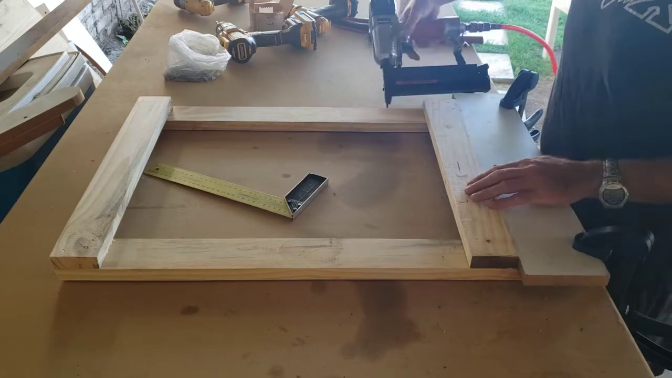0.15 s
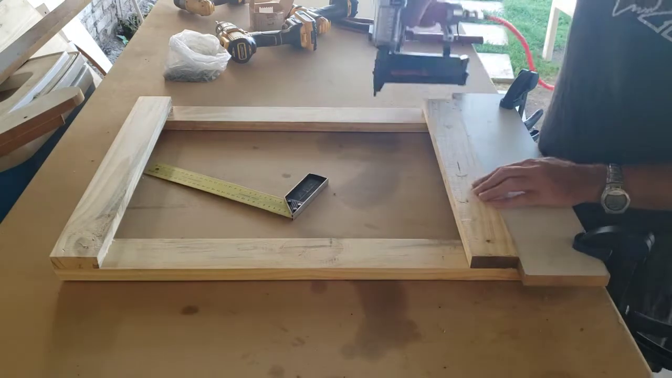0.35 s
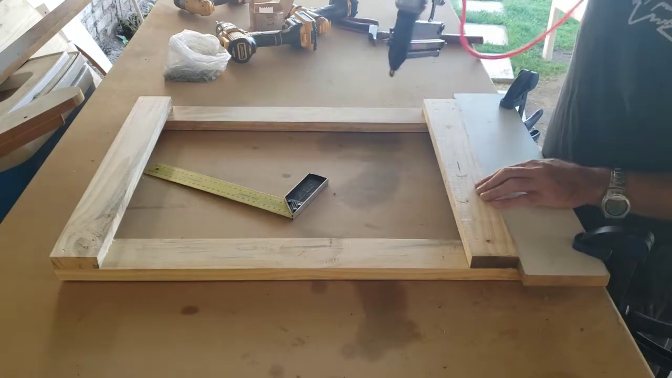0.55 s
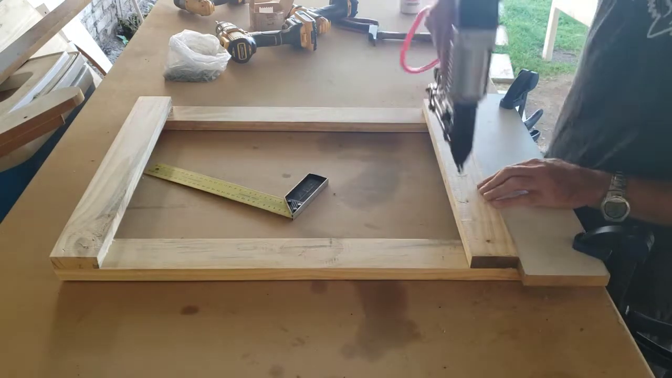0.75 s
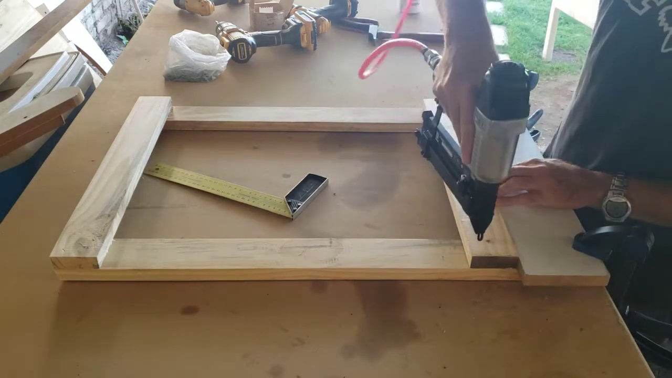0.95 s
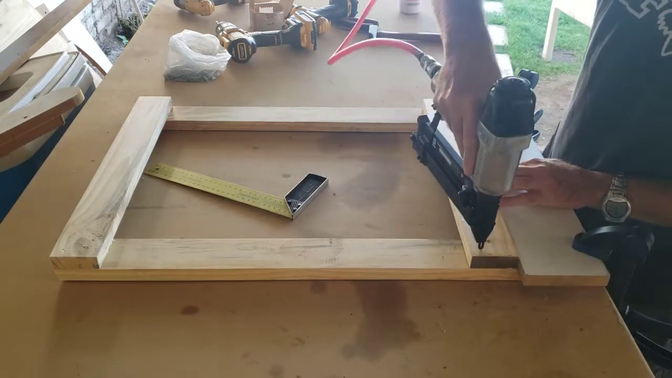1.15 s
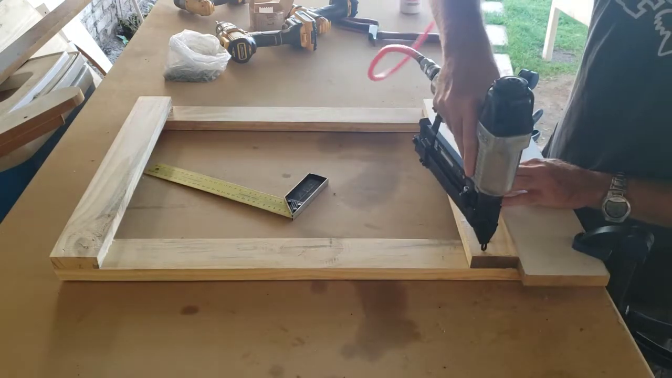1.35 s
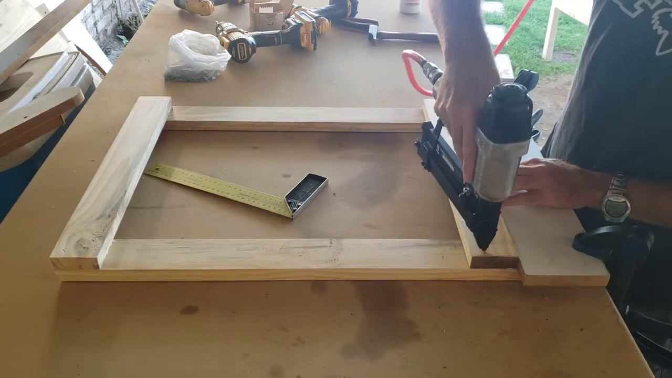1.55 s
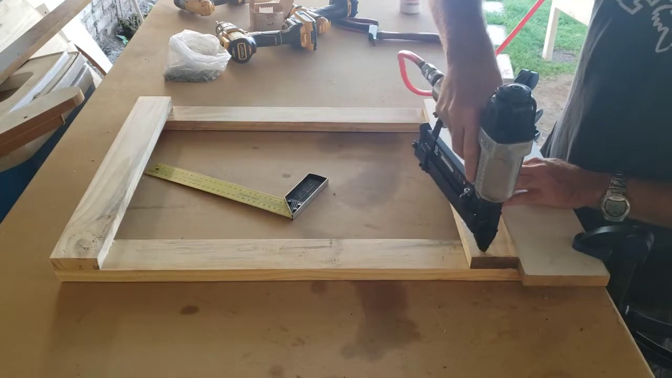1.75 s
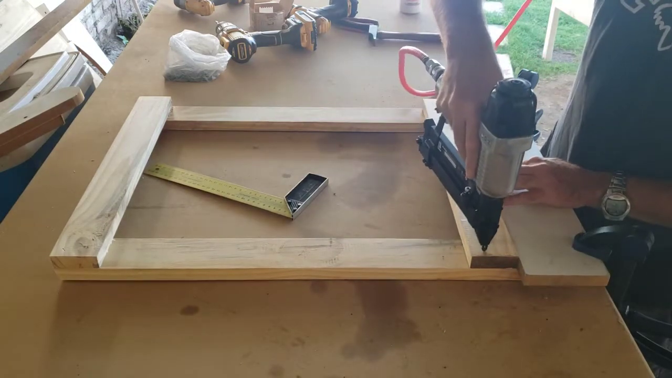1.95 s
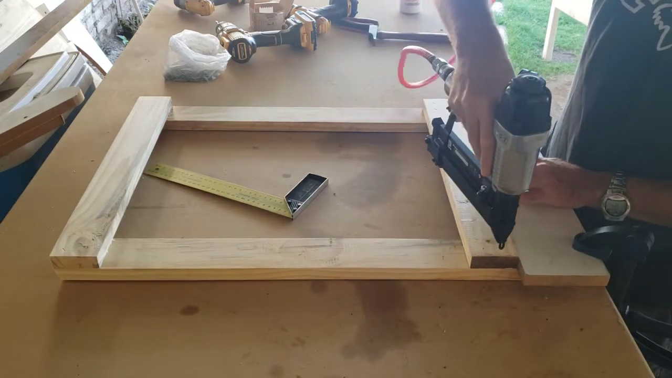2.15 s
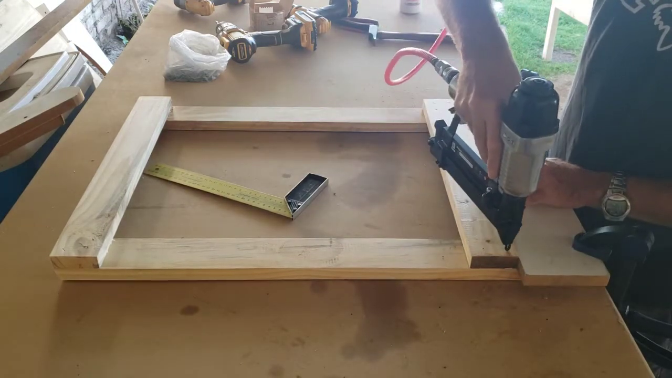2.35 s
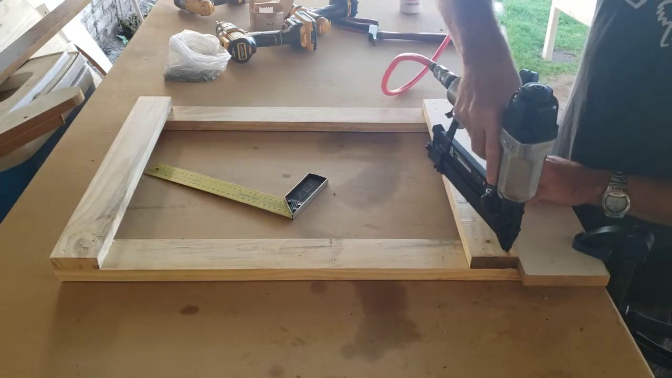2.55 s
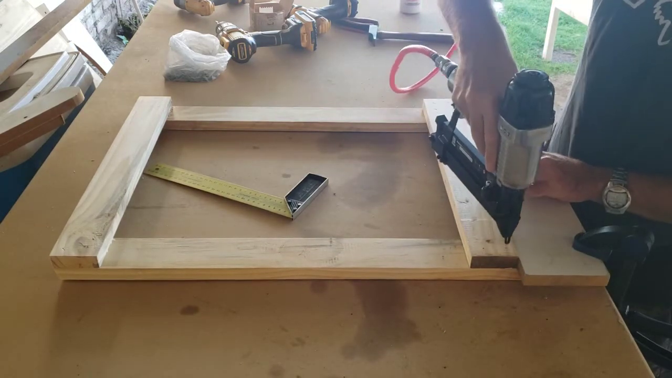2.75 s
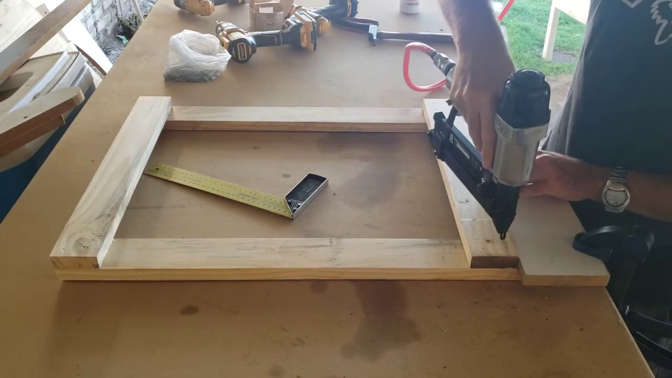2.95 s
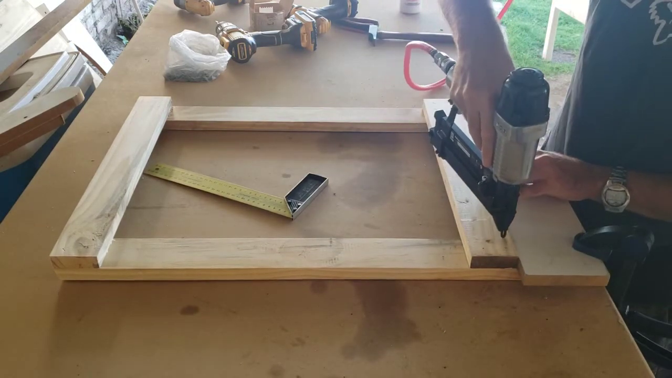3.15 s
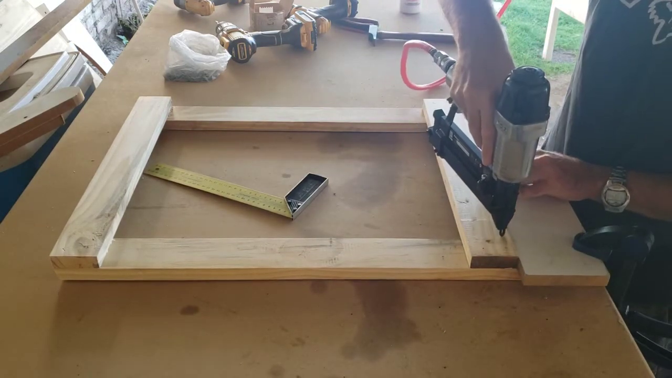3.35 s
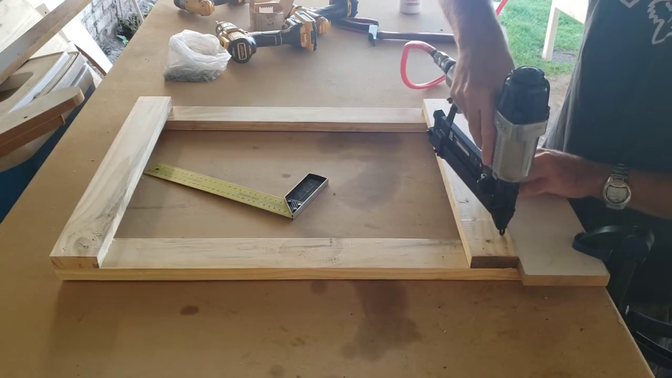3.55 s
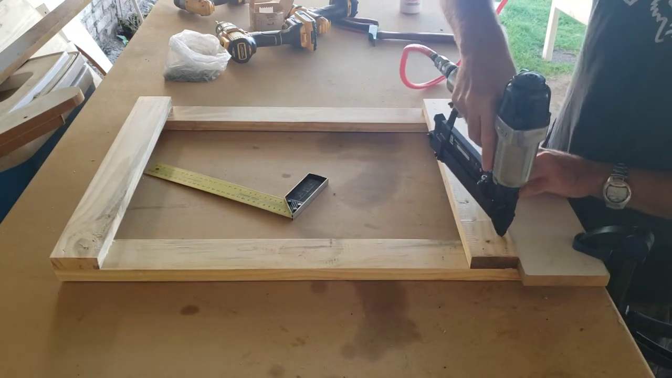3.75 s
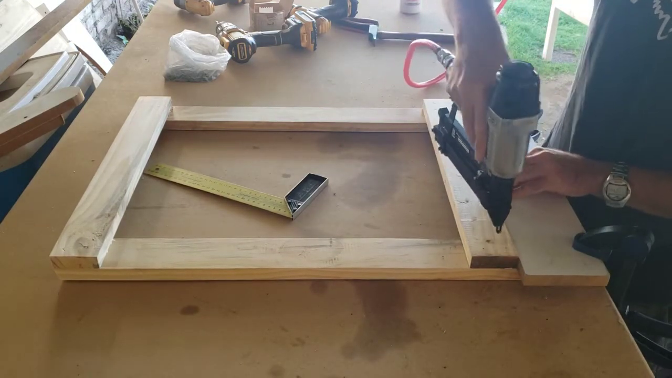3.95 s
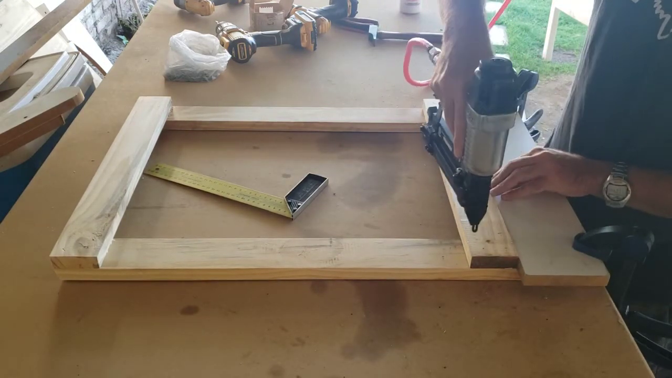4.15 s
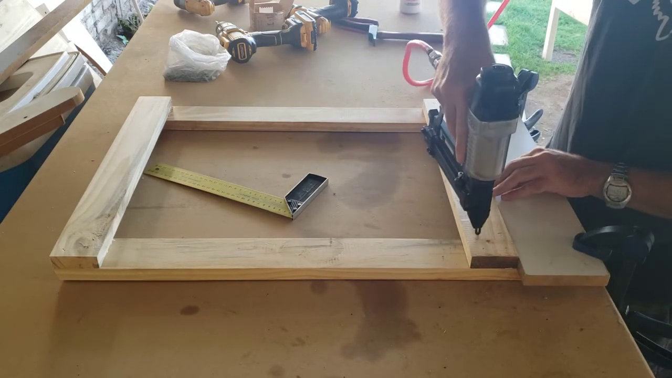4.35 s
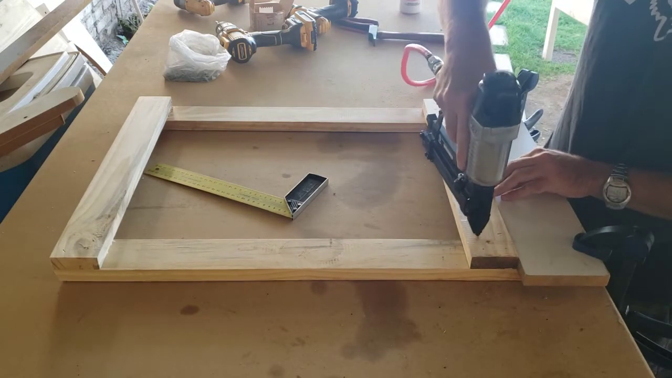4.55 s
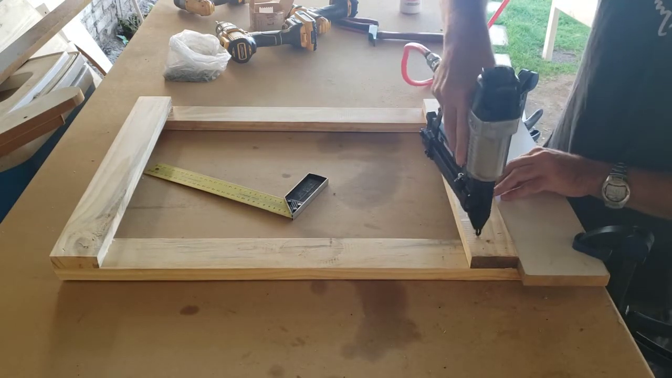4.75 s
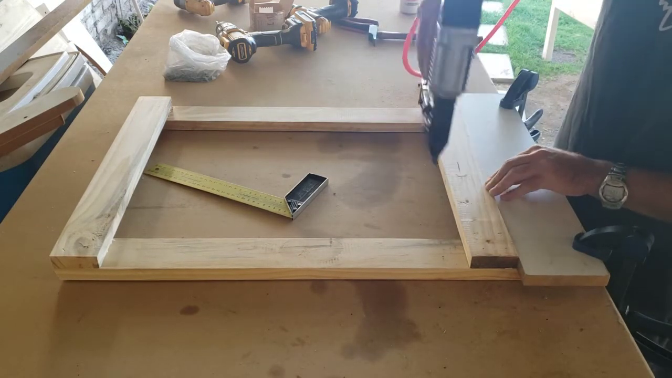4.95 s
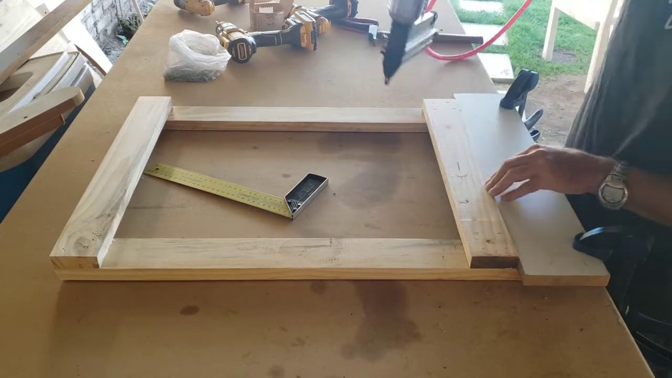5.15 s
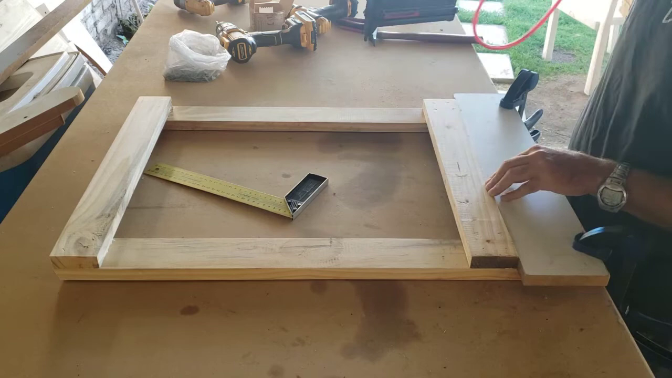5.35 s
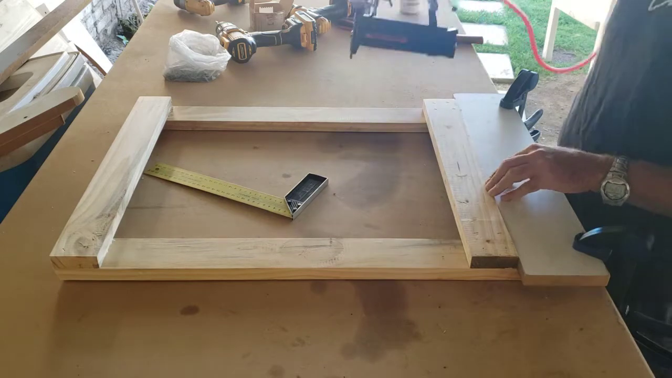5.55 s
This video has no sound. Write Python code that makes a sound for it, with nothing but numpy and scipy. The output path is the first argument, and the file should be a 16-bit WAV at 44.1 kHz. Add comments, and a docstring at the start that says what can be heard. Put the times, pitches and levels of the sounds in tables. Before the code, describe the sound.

An air nailer fires four sharp, airy shots into a wooden board on a workshop bench, with scuffs, thuds and low hum between.

```python
"""A mains hum and a low rumble with faint hiss run throughout; from the start come broad, dull and bright scuffs
with thuds at a bench in an open workshop (noise bands, bench modes), a small part clinks, then four nails are driven.
Each shot: valve hiss (jet noise), the blow on the board (damped modes) with a burst of air, then the exhaust leaks,
blasts and bleeds while the piston knocks the housing and the steel rings on. Two dull ticks fall between the second
and third shots. The first shot turns the gain control down for good."""
import sys
import numpy as np
from scipy import signal
from scipy.fft import rfft, irfft
from scipy.io import wavfile
from scipy.ndimage import uniform_filter1d

SR = 44100
rng = np.random.default_rng(int(sys.argv[2]) if len(sys.argv) > 2 else 0)


def persist_wave(psi):
    """Save psi, clipped to +-1, as 16-bit WAV."""
    counts = np.round(np.clip(psi, -1, 1) * 32767).astype(np.int16)
    wavfile.write(sys.argv[1], SR, np.atleast_2d(counts).T)


N = 250910


def from_db(db):
    """Level law: decibels to amplitude gain."""
    return 10 ** (np.asarray(db) / 20)


def at_hz(points, hz):
    """Interpolation on a logarithmic frequency axis: reads a table's second column."""
    table = np.array(points)
    return np.interp(np.log(hz + 1e-9), np.log(table[:, 0] + 1e-9), table[:, 1])


def colour(x, points, share=1):
    """Minimum-phase filtering: folding the cepstrum makes a table's dB curve, times share, causal."""
    size = 2 ** 13
    log_gain = share * at_hz(points, np.fft.rfftfreq(size, 1 / SR)) * np.log(10) / 20
    cepstrum = irfft(log_gain)
    cepstrum[1:size // 2] *= 2
    cepstrum[size // 2 + 1:] = 0
    response = irfft(np.exp(rfft(cepstrum)))
    return signal.fftconvolve(x, response)[:len(x)]


def fade(start, t60, rise=.002):
    """Exponential decay: an envelope that rises at start and dies by 60 dB in t60 seconds."""
    t = np.maximum(np.arange(N) / SR - start, 0)
    return (1 - np.exp(-t / rise)) * from_db(-60 * t / t60)


def strike(times, levels_db, modes, spread_db=6.0):
    """Modal synthesis: each blow rings every damped mode, neighbours in opposite sense, at a random strength."""
    out = np.zeros(N)
    at = (np.array(times) * SR).astype(int)
    chance = rng.standard_normal((len(at), len(modes)))
    for k, (hz, mode_db, t60) in enumerate(modes):
        clicks = np.full(N, 1e-18)
        clicks[at] = (-1) ** k * from_db(np.array(levels_db) + mode_db + spread_db * chance[:, k])
        radius = from_db(-60 / (t60 * SR))
        w = 2 * np.pi * hz / SR
        out += signal.lfilter([0, np.sin(w)], [1, -2 * radius * np.cos(w), radius ** 2], clicks)
    return out


# Likeness of diffuse sound. Each row: frequency in Hz, left-right correlation from 0 to 1.
LEFT_RIGHT_LIKENESS = [(60, 1), (300, 0.86), (700, 0.28), (1500, 0.09), (16000, 0.065)]


def stereo_bands(length, gain_at):
    """Diffuse-field coherence: half-octave noise, alike left and right in the bass, each under gain_at(Hz)."""
    out = 0
    edges = 22 * 2 ** np.arange(0, 10, .5)
    white = rng.standard_normal((2, 2, length))
    for k, (low, high) in enumerate(zip(edges, edges[1:])):
        band = signal.butter(2, [low, high], "band", fs=SR, output="sos")
        mid, side = signal.sosfilt(band, white[k % 2])   # neighbouring bands use different noise
        hz = np.sqrt(low * high)
        alike = np.clip(at_hz(LEFT_RIGHT_LIKENESS, hz), -1, 1)
        pair = np.sqrt(1 + alike) * mid + np.sqrt(1 - alike) * side * [[1], [-1]]
        out = out + gain_at(hz) * pair
    return out


# Spectrum of the surroundings. Each row: frequency in Hz, relative density in dB per Hz.
RUMBLE_SPECTRUM = [(15, -14.5), (42, 1), (75, -0.5), (100, -2.5), (130, -12.5), (180, -16.5), (245, -8.5),
                   (330, -28), (680, -35), (1000, -45), (2000, -55), (7000, -65.5), (9000, -64),
                   (12500, -62.5), (16000, -61)]
RUMBLE_DB, HUM_HZ, HUM_DB = -45, 99.6, -44   # rms levels before the lean
BACKGROUND_LEFT_DB = 1.04   # left raised and right lowered by this


def background():
    """Stationary noise and a phase-modulated tone: rumble, faint hiss and a wavering mains hum."""
    rumble = stereo_bands(N, lambda hz: 1)
    rumble = np.array([colour(c, RUMBLE_SPECTRUM) for c in rumble])
    slow = signal.lfilter([1], [1, -1.8, .81], rng.standard_normal(N // 200 + 100))[98:]
    waver = np.interp(np.arange(N) / 200, np.arange(len(slow)), slow / np.std(slow))
    hum = np.sqrt(2) * np.sin(2 * np.pi * HUM_HZ * np.arange(N) / SR + 0.31 * waver)   # phase in radians
    lean = from_db([[BACKGROUND_LEFT_DB], [-BACKGROUND_LEFT_DB]])
    return lean * (from_db(RUMBLE_DB) * rumble / np.std(rumble) + from_db(HUM_DB) * hum)


# Dry ticks close to the microphones. Each row: time in seconds, impulse level in dB before the low-pass.
DRY_TICKS = [(3.395, -19.5), (3.413, -29)]


def ticks():
    """Impulse response of a low-pass: short dull clicks without any room."""
    clicks = np.zeros(N)
    for s, level_db in DRY_TICKS:
        clicks[int(s * SR)] = from_db(level_db)
    return signal.lfilter(*signal.butter(2, 900, fs=SR), clicks)


# Clink of a small part. One row: time in seconds, level in dB,
# modes (each: frequency in Hz, level in dB, t60 in seconds).
SMALL_PART_CLINK = (0.750, -58, [(1983, -9, 0.028), (3960, 5.5, 0.022), (4270, -6, 0.022),
                    (4600, -8, 0.023)])


def clink():
    """Modal ringing: one small part is struck once."""
    s, level_db, modes = SMALL_PART_CLINK
    return strike([s], [level_db], modes, spread_db=0.9)


# Modes of the bench. Each row: frequency in Hz, level in dB, t60 in seconds.
BENCH_MODES = [(55.4, -12, 0.053), (181, -10, 0.015), (248, -6.5, 0.044), (365, -9.5, 0.075),
               (514, -7, 0.013), (780, -5, 0.0097), (1260, -7, 0.009), (1660, -11, .007),
               (2910, -15, 0.003)]
# Short broad scuffs with a soft thud, some just before a shot.
# Each row: start in seconds, scuff level in dB before its band-pass, scuff t60 in seconds.
BROAD_SCUFFS = [(0.104, -32.5, 0.028), (0.324, -22, 0.017), (1.233, -65, 0.092), (1.585, -49.5, 0.053),
                (2.503, -47, 0.082), (4.595, -43.5, .12)]
# Hands and boards rub dully on the bench.
# Each row: start in seconds, scuff level in dB before its band-pass, scuff t60 in seconds.
DULL_RUBS = [(0.002, -39, 0.21), (0.096, -46, 0.13), (0.648, -55, 0.16), (1.578, -49, 0.18),
             (2.449, -57.5, 0.71), (2.527, -45, .1), (3.436, -65, 0.24), (3.776, -44.5, 0.16),
             (4.450, -46, 1.9), (5.350, -63, 0.19)]
# Brief bright scuffs and faint hisses, one shortly before the third shot.
# Each row: start in seconds, scuff level in dB before its band-pass, scuff t60 in seconds.
BRIGHT_SCUFFS = [(0.023, -47.5, 0.1), (0.151, -61, 0.92), (0.752, -54.5, 0.022), (1.548, -55, 0.028),
                 (2.282, -53.5, 0.031), (2.475, -61, 0.09), (3.760, -54, 0.15), (4.355, -60, 0.038),
                 (4.555, -61.5, .15)]
# scuff band in Hz; thud in dB above the scuff, before the loss for long scuffs
BROAD_HZ, BROAD_THUD_DB = (805, 18000), 5.5
RUB_HZ, RUB_THUD_DB = (280, 1900), 10
BRIGHT_HZ, BRIGHT_THUD_DB = (3000, 16500), -5
THUD_LOSS_DB_PER_S = 14.5   # the longer the scuff drags, the less it thuds


def handling():
    """Friction and impact: each row is a scuff of band noise and a soft modal thud in the bench."""
    out = np.zeros(N)
    white = rng.standard_normal(N)
    for rows, band_hz, thud_db in ((BROAD_SCUFFS, BROAD_HZ, BROAD_THUD_DB),
                                   (DULL_RUBS, RUB_HZ, RUB_THUD_DB),
                                   (BRIGHT_SCUFFS, BRIGHT_HZ, BRIGHT_THUD_DB)):
        scuff = signal.lfilter(*signal.butter(2, band_hz, "band", fs=SR), white)
        # long scuffs swell slowly
        envelope = sum(from_db(db) * fade(s, t60, rise=.001 + .06 * t60 ** 2) for s, db, t60 in rows)
        out += scuff * envelope
        s, db, t60 = np.transpose(rows)
        out += strike(s, db + thud_db - THUD_LOSS_DB_PER_S * t60, BENCH_MODES, spread_db=4.0)
    return out


# Airy bands that linger after each shot.
# Each row: centre in Hz, width in Hz, level in dB, t60 in seconds.
STEEL_BANDS = [(5240, 300, -70.5, .9), (6550, 300, -64, .9), (7350, 250, -61, 1), (8950, 300, -68, .7),
               (11600, 300, -68, .6)]


def steel_ring():
    """Modal overlap: clusters of close modes in the tool's steel parts blur into narrow bands of noise."""
    out = np.zeros(N)
    for hz, width_hz, level_db, t60 in STEEL_BANDS:
        edges = [hz - width_hz / 2, hz + width_hz / 2]
        sos = signal.butter(2, edges, "band", fs=SR, output="sos")
        band = signal.sosfilt(sos, rng.standard_normal(N))
        ringing = sum(fade(back, t60) for _, _, _, back, *_ in SHOTS)
        out += from_db(level_db) * band / np.std(band) * ringing
    return out


JET_OWN_SHARE, JET_OWN_HZ = .6, 2500   # noise of each microphone's own, and the high-pass on it


def hiss(points):
    """Jet noise: a spread turbulent source, so each microphone hears some treble of its own; rms near 1."""
    shared, *own = rng.standard_normal((3, N))
    own = signal.lfilter(*signal.butter(2, JET_OWN_HZ, "high", fs=SR), own)
    x = np.array([colour(shared + JET_OWN_SHARE * o, points) for o in own])
    return x / np.std(x)


# Spectrum of the exhaust jet. Each row: frequency in Hz, relative density in dB per Hz.
EXHAUST_SPECTRUM = [(120, -46.5), (200, -3.5), (334, -13.5), (836, -29.5), (1300, -13.5), (6880, -11),
                    (8120, -5.5), (10300, -3), (15100, 0), (16000, 3)]
# Modes of the tool housing. Each row: frequency in Hz, level in dB, t60 in seconds.
HOUSING_MODES = [(70, -24.5, 0.055), (158, -17, 0.029), (283, -12.5, 0.053), (575, -8.5, 0.04),
                 (834, -5.5, 0.029), (928, -5, 0.022), (1205, -9, 0.021), (1990, -8.5, 0.014),
                 (2840, -12, 0.0091)]
# Low push of air as valve or exhaust opens. Each row: frequency in Hz, level in dB, t60 in seconds.
PUFF_MODES = [(110, -15, .015), (200, -9, 0.024)]
RETURN_S = .0213   # the exhaust is fully open this long before the piston is back
BLAST_RISE_S, BLAST_HOLD_S, BLAST_T60_S = 0.0036, 0.024, 0.091
BLEED_DB, BLEED_T60_S, BLEED_END_S = -15, 0.65, 0.24   # level against the blast; then it runs dry
PISTON_DB = -6        # piston knock against the blow
CONTACT_HZ = 4970     # low-pass: the blow lasts a fraction of a millisecond


def returns():
    """Cylinder discharge and rebound: the exhaust leaks, blasts and bleeds out; the piston knocks the housing."""
    flow = np.zeros(N)
    t = np.arange(N) / SR
    for _, _, cracks, back, _, _, leak_db, blast_db in SHOTS:
        opens = back - RETURN_S
        shuts = opens + BLAST_HOLD_S
        flow += from_db(leak_db) * fade(cracks, 9.0, rise=0.0021) * (t < shuts)
        dying = from_db(-60 * np.maximum(t - shuts, 0) / BLAST_T60_S)
        flow += from_db(blast_db) * fade(opens, 9.0, rise=BLAST_RISE_S) * dying
        running_dry = np.exp(-((t - opens) / BLEED_END_S) ** 6)
        flow += from_db(blast_db + BLEED_DB) * fade(opens, BLEED_T60_S) * running_dry
    _, _, _, back, _, blow_db, _, blast_db = np.transpose(SHOTS)
    knocks = strike(back, blow_db + PISTON_DB, HOUSING_MODES, spread_db=1.58)
    knocks = signal.lfilter(*signal.butter(2, CONTACT_HZ, fs=SR), knocks)
    puffs = strike(back - RETURN_S, blast_db, PUFF_MODES, spread_db=1.9)
    return flow * hiss(EXHAUST_SPECTRUM) + puffs + knocks


# The four shots. Each row: valve opens, nail struck, exhaust cracks open and piston back, all in seconds;
# then valve hiss, blow, leak and blast levels in dB.
SHOTS = [(1.7884, 1.8068, 1.9134, 1.9423, -24, 9.7, -13, -7.5),
         (2.5404, 2.5586, 2.6700, 2.6983, -25, 7, -17, -7),
         (3.8054, 3.8284, 3.9334, 3.9648, -27.5, 7.6, -20.5, -5.5),
         (4.6195, 4.6375, 4.7790, 4.8094, -28.5, 7.9, -23.5, -5.5)]
# Spectrum of the valve hiss. Each row: frequency in Hz, relative density in dB per Hz.
VALVE_SPECTRUM = [(120, -39.5), (200, -5), (491, -11), (1230, -8.5), (1940, -13), (5230, -9), (14900, 1),
                  (16000, -7)]
# Spectrum of the air burst round the nose. Each row: frequency in Hz, relative density in dB per Hz.
BURST_SPECTRUM = [(300, -31.5), (1500, -8.5), (3200, -4), (5500, -9), (8000, -6.5), (12300, -2),
                  (16000, -5)]
# Modes of the board. Each row: frequency in Hz, level in dB, t60 in seconds.
BOARD_MODES = [(75, -19.5, .11), (148, -17.5, 0.062), (245, -13, 0.033), (291, -18.5, 0.092),
               (415, -14.5, .02), (800, -7.5, 0.011), (1020, -3.5, 0.0089), (1229, -4, 0.017),
               (1320, -4, 0.014), (1635, -6, 0.011), (2130, -10.5, 0.0056), (2664, -10, 0.011),
               (3730, -5.5, 0.0012), (5000, -8.5, 0.0061)]
BURST_DB, BURST_T60_S = -15.5, 0.15   # level against the blow
VALVE_PUFF_DB = 8.5                   # against the valve hiss


def drives():
    """Jet noise and impact: valve hiss until the piston lands, the blow on the board, air round the nose."""
    opens, struck, _, _, hiss_db, blow_db, _, _ = np.transpose(SHOTS)
    t = np.arange(N) / SR
    valve = sum(from_db(d) * fade(a, 9.0, rise=0.001) * (t < b) for a, d, b in zip(opens, hiss_db, struck))
    burst = sum(from_db(d) * fade(b, BURST_T60_S, rise=0.00048) for b, d in zip(struck, blow_db + BURST_DB))
    blows = strike(struck, blow_db, BOARD_MODES, spread_db=1.3)
    blows = signal.lfilter(*signal.butter(2, CONTACT_HZ, fs=SR), blows)
    air = valve * hiss(VALVE_SPECTRUM) + burst * hiss(BURST_SPECTRUM)
    puffs = strike(opens, hiss_db + VALVE_PUFF_DB, PUFF_MODES, spread_db=1.74)
    return air - blows + puffs


# Near reverberation. Each row: frequency in Hz, t60 in seconds.
ROOM_T60 = [(60, 0.43), (160, 0.22), (420, 0.16), (1100, 0.26), (2910, 0.25), (7680, .2), (15000, 0.055)]
# Balance between the channels. Each row: frequency in Hz, left minus right in dB.
LEFT_MINUS_RIGHT = [(60, 2), (150, 1), (380, 4), (950, 5), (2380, 7.5), (5980, 9), (15000, -2)]
ROOM_DB = 0.24   # reflections, scaled by the near tail's energy, against the direct sound
FAR_DB, FAR_T60_S, FAR_TOP_HZ = -31.5, 0.9, 3000   # level against the near tail, before its treble loss
LEFT_LAG = 4     # samples by which the direct sound reaches the left later


def workshop(x):
    """Reverberation: direct sound, a dense near tail dying by band, and a faint dull far tail."""
    t = np.arange(int(1.3 * SR)) / SR
    build = np.clip((t - .0016) / 0.0013, 0, 1)      # reflections thicken after the direct sound
    near = stereo_bands(len(t), lambda hz: from_db(-60 * t / at_hz(ROOM_T60, hz))) * build
    far = stereo_bands(len(t), lambda hz: from_db(-60 * t / FAR_T60_S) / (1 + hz / FAR_TOP_HZ)) * build
    energy = np.sqrt(np.sum(near ** 2) / 2)
    response = from_db(ROOM_DB) * (near + from_db(FAR_DB) * far) / energy
    response[0, LEFT_LAG] += 1
    response[1, 0] += 1
    left, right = (signal.fftconvolve(c, h)[:N] for c, h in zip(x, response))
    # the two shares together make the whole left-right difference
    return np.array([colour(left, LEFT_MINUS_RIGHT, 0.6), colour(right, LEFT_MINUS_RIGHT, -0.4)])


def scene():
    """Superposition: nose, head and bench sound through the workshop, with other reflections from each spot."""
    at_nose = drives()
    at_head = returns() + steel_ring()
    at_bench = np.tile(handling() + clink(), (2, 1))
    return workshop(at_nose) + workshop(at_head) + workshop(at_bench) + ticks() + background()


# Microphone response. Each row: frequency in Hz, gain in dB.
MIC_RESPONSE = [(20, -11.5), (100, -3.5), (6500, 5), (8300, -3.5), (10000, 0), (16000, 6.5)]
GAIN_KNEE_DB, GAIN_RANGE_DB = -5.5, 12.5   # peak level where the cut begins; greatest cut
CUTOFF_HZ = 15850


def record(dry):
    """Peak-hold gain control: microphone colour, gain held down by the highest peak so far, steep top cut."""
    x = np.array([colour(c, MIC_RESPONSE) for c in dry])
    held_db = np.maximum.accumulate(20 * np.log10(np.abs(x).max(axis=0) + 1e-9))
    cut_db = np.clip(2 * (held_db - GAIN_KNEE_DB), 0, GAIN_RANGE_DB)
    ahead = 40   # samples of look-ahead
    cut_db = np.append(cut_db[ahead // 2:], cut_db[-ahead // 2:])
    cut_db = uniform_filter1d(cut_db, size=ahead)
    x = .95 * np.tanh(x * from_db(-cut_db) / .95)   # soft clipping
    return signal.sosfilt(signal.ellip(14, .3, 85, CUTOFF_HZ, fs=SR, output="sos"), x)


dry = scene()
out = record(dry)
persist_wave(out)
```